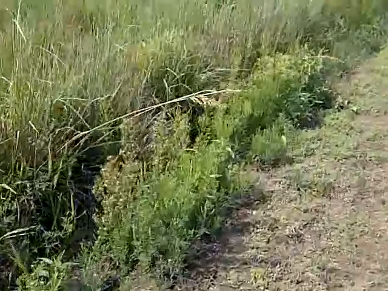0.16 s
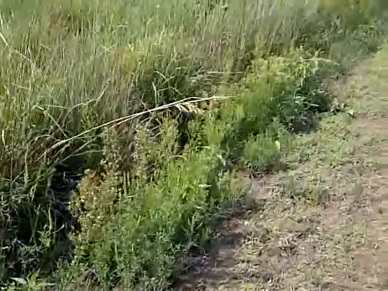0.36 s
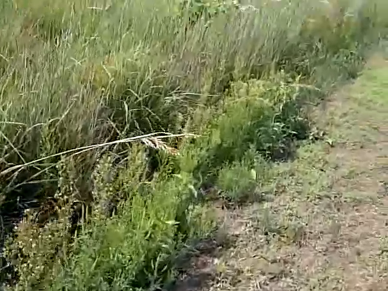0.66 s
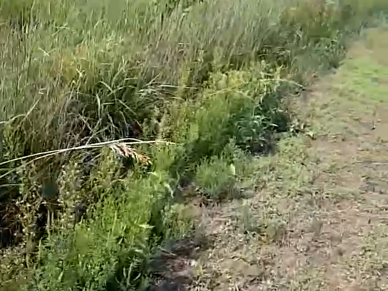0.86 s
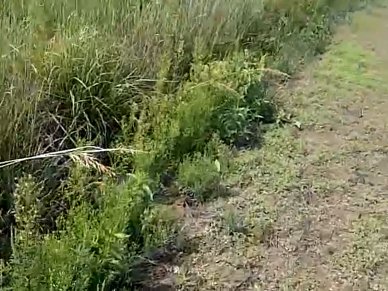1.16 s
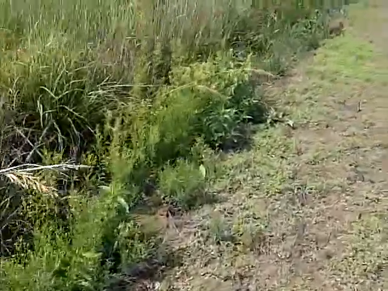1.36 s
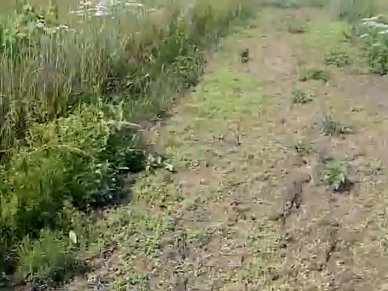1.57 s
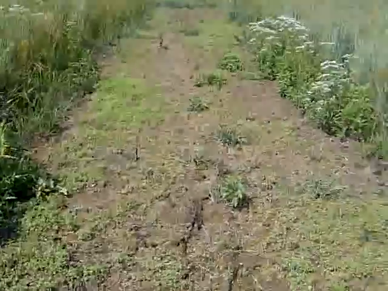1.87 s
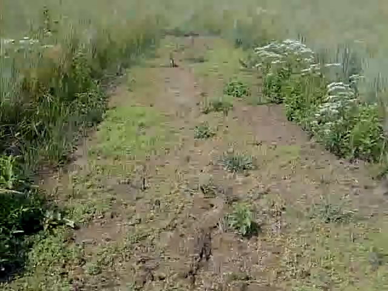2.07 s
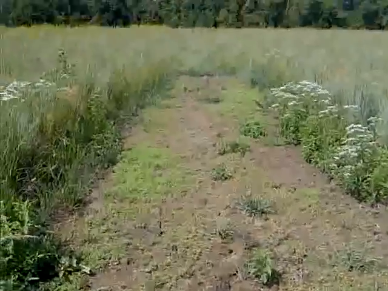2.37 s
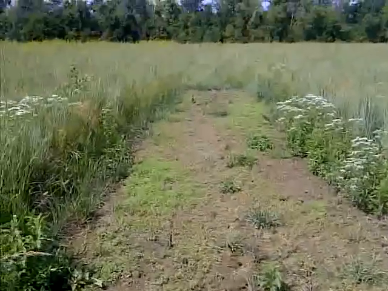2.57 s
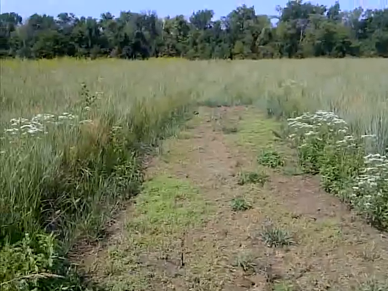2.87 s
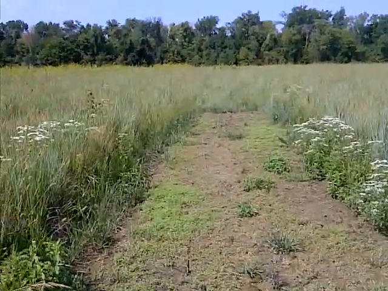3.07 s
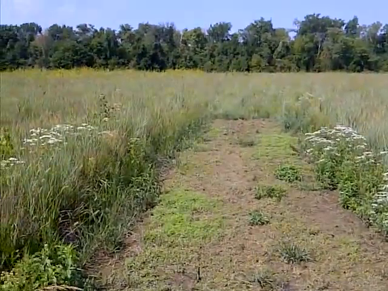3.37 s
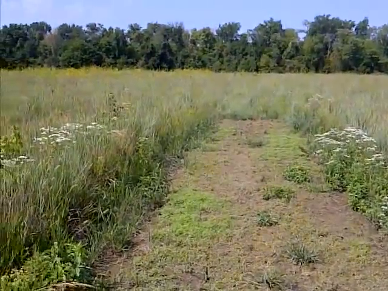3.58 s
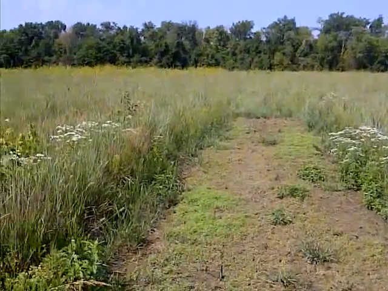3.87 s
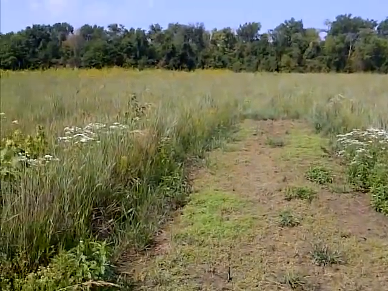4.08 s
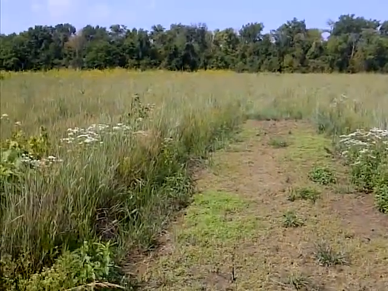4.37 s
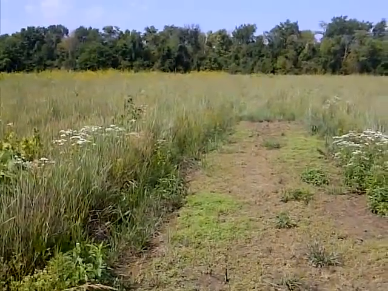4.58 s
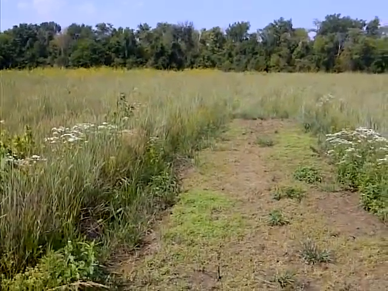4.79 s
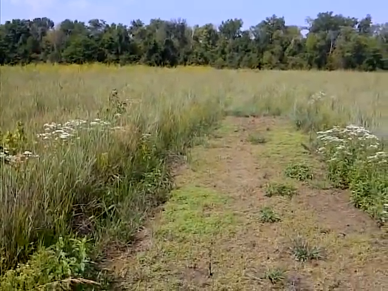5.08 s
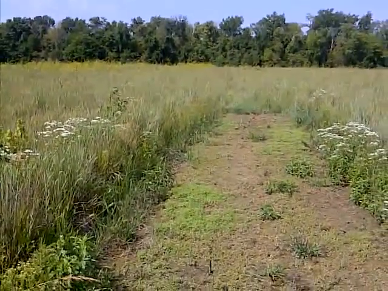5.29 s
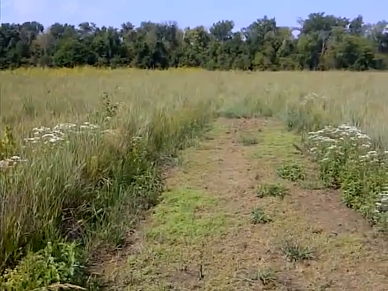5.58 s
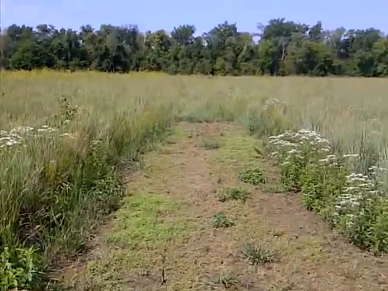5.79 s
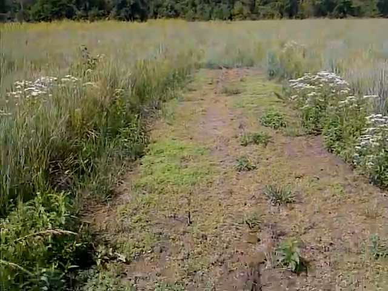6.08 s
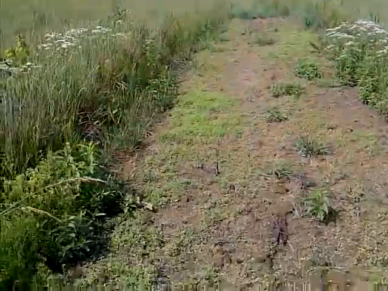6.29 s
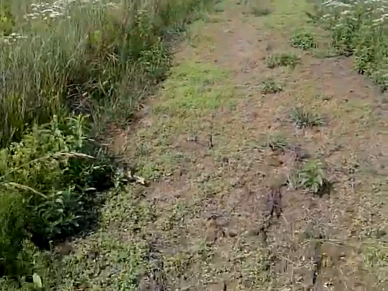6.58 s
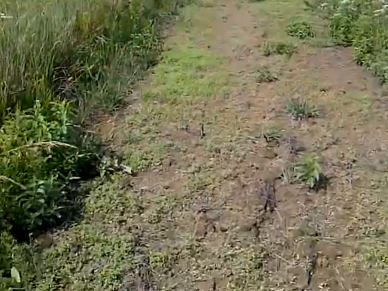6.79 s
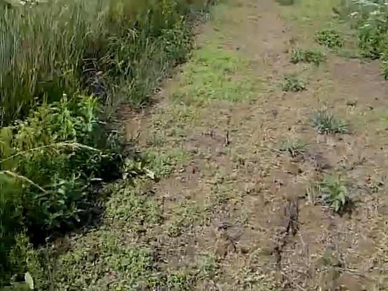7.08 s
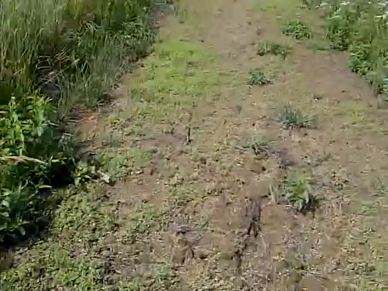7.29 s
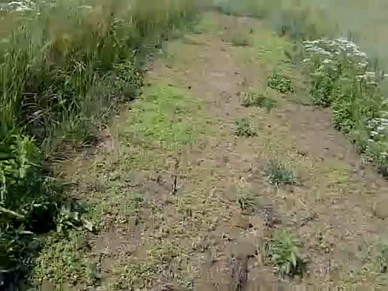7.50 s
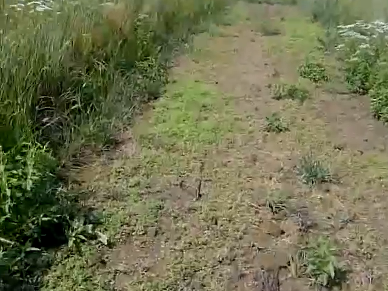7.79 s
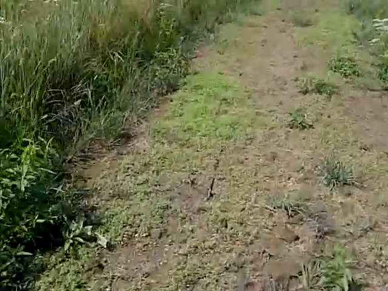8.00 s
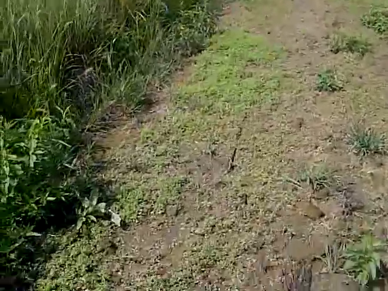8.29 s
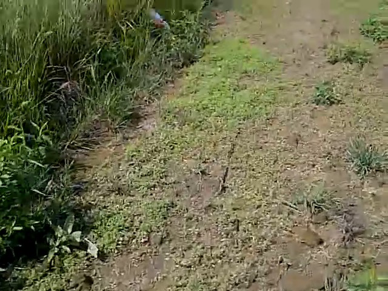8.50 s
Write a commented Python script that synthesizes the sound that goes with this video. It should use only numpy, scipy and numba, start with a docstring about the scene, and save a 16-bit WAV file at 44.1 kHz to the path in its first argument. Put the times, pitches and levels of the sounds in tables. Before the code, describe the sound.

A hound's faint yips grow into high, cracking bays over distant engine putter, wind rumble, rustling grass and sharp stalk snaps in an open meadow.

```python
"""A small one-cylinder engine revs some way off, as pulses ringing resonances, over leaf hiss and insects (band noise).
Wind rumbles and thumps on a hand-held phone (low noise, damped sines); from 1.4 s stalks snap, as damped tones and
noise, and grass swishes, as band noise. From 2.8 s a hound yips and from 4.7 s it bays, as harmonics with throat noise.
Its voice comes to break between a high note and half that pitch. From 5.8 s the engine's hiss swells and brightens,
and from 6 s harder snaps and more swishes join the bays, which last to the end."""
import sys
import numpy as np
from scipy import signal
from scipy.fft import rfft, irfft
from scipy.io import wavfile
from scipy.ndimage import uniform_filter1d
from numba import njit

SR = 44100
rng = np.random.default_rng(int(sys.argv[2]) if len(sys.argv) > 2 else 0)


def field_ratio(decibels):
    """Amplitude ratio for a level in dB (20 dB per decade); scalars and array-likes work."""
    return 10 ** (np.asarray(decibels, dtype=float) / 20)


def unload_audio(sound):
    """Save the sound as a 16-bit wav file, at the path given as the first command line argument."""
    columns = np.transpose(np.atleast_2d(sound))
    # keep every value between -1 and 1, then stretch to whole-number steps
    steps = np.round(np.clip(columns, -1, 1) * 32767)
    wavfile.write(sys.argv[1], SR, steps.astype(np.int16))


N = 381465

# Vocal-fold curves, one list a bay: (time [s], high note [Hz], effort [dB], voice break: half note over high note [dB],
# mouth opening: octave over effort [dB], roughness [0-1])
BAY_CURVES = [
    [(4.66, 1327, -39, -58, -22.5, 0.1), (4.672, 1412, -27.5, -65, -23, 0.04),
     (4.69, 1528, -34, -62, -13, 0.03), (4.71, 1512, -34.5, -65, 0, 0.03),
     (4.75, 1427, -26, -60, -19, 0.02), (4.78, 1397, -23.5, -66, -15, 0.02),
     (4.855, 1286, -34.5, -58, -4.5, 0.05), (4.875, 1418, -32.5, -45, -20, 0.05),
     (4.897, 1483, -32, -53, -25, 0), (4.91, 1326, -45, -60, -48, .08), (4.925, 714, -61, -63, -20, 0.2)],
    [(5.072, 898, -38.5, -58, -34.5, 0), (5.084, 901, -25.5, -61.5, -19, 0.01),
     (5.099, 976, -23.5, -56.5, -28, 0.06), (5.104, 1390, -24.5, -50, -19, 0.01),
     (5.12, 1467, -19.5, -61, -18, 0), (5.14, 1460, -18, -60.5, -29.5, 0.02),
     (5.17, 1434, -19, -31, -21, 0.01), (5.2, 1349, -23, -52, -8.5, 0.03),
     (5.215, 1414, -26, -61, -13.5, 0.03), (5.23, 1293, -64, -59, -16, .05)],
    [(5.556, 950, -38.5, -65.5, -35, .05), (5.568, 954, -23.5, -56, -30.5, 0),
     (5.58, 874, -27, -34.5, -12, 0.45), (5.587, 1397, -27, -17, -34, 0.24),
     (5.598, 1457, -21.5, -65, -20.5, 0.02), (5.61, 1490, -23.5, -31, -20.5, 0.02),
     (5.63, 1468, -21.5, -29, -27, 0.02), (5.65, 1427, -20, -1.5, -22, 0.01),
     (5.665, 1419, -20.5, -1, -32.5, 0.03), (5.69, 1294, -32, -1.5, -10.5, 0.03),
     (5.705, 1267, -33, -52, -19, 0), (5.735, 1340, -48, -49, -16.5, 0.14)],
    [(7.137, 1570, -45, 19, -34, 0.2), (7.151, 1472, -40, 5.5, -36.5, 0.75),
     (7.165, 1690, -29.5, 16, -42.5, 0.89), (7.175, 1315, -28.5, -3.5, -21, 0.61),
     (7.19, 1415, -31, -7.5, -8, 0), (7.217, 1397, -27, -2, -2, 0.27),
     (7.235, 1329, -20, -12.5, -12.5, 0.1), (7.252, 1357, -19, -15.5, -9, 0.21),
     (7.267, 1332, -15, -19, -15.5, 0.07), (7.285, 1287, -18.5, -16, -19, 0.06),
     (7.3, 1297, -17.5, -20, -11, 0.09), (7.345, 1282, -29.5, -48, -14, 0.08),
     (7.37, 1208, -61, -45.5, 24.5, 0.09), (7.39, 1212, -48, -46, 9, 0.07),
     (7.41, 1408, -42.5, -45, -16, 0.2), (7.425, 1320, -61, -45, -14, .05)],
    [(7.655, 1528, -31.5, 31, -43, 0.3), (7.67, 1495, -27.5, 21, -10.5, 0.55),
     (7.685, 1644, -12.5, 25.5, -38, 0.08), (7.695, 1374, -30, 10.5, 4, 0.61),
     (7.71, 1434, -24.5, -20, -3, 0), (7.73, 1367, -31, 12, -6.5, 0.03),
     (7.745, 1470, -22, 11.5, -39, 0.05), (7.762, 1410, -30.5, 1.5, 3.5, 0),
     (7.78, 1349, -16, 13.5, -20, 0), (7.8, 1337, -26, -5, -3.5, 0.01), (7.82, 1244, -28.5, 2, -18, .05),
     (7.835, 1265, -36, -42, -15.5, 0), (7.85, 1290, -30.5, -25.5, -17.5, 0.03),
     (7.88, 1262, -42.5, -46.5, -32, 0.2)],
    [(8.153, 1214, -45, 30, -35, 0.05), (8.161, 1364, -19.5, 41, -43, 0.17),
     (8.175, 1425, -24, 36, -17, 0.65), (8.19, 1277, -24, 12, -6, 0.51), (8.21, 1279, -33, -12, 8.5, 0),
     (8.23, 1269, -22, 12.5, -4.5, 0.6), (8.25, 1282, -20, 16.5, -4, 0.43),
     (8.27, 1225, -19, 14, -9.5, 0.67), (8.29, 1121, -17, 3.5, -27, 0.31),
     (8.307, 1158, -22.5, 9, -22.5, .7), (8.34, 1152, -18, 9, -28, 0.34),
     (8.36, 1186, -17.5, -1.5, -18.5, .04), (8.42, 1241, -14, 7.5, -29.5, 0.01),
     (8.46, 1236, -16.5, 10.5, -14.5, 0.03), (8.5, 1182, -19.5, -5.5, -44.5, 0),
     (8.53, 1164, -21, -4, -26, .02), (8.557, 1217, -18, 2, -22.5, 0.02),
     (8.575, 1186, -16, 7, -25.5, 0.09), (8.595, 1136, -28, 5, -26, 0.01), (8.61, 1246, -28, -34, -8, 0.05),
     (8.635, 1206, -41, -45, -21, 0.2), (8.649, 785, -55, -45, -28, 0.2)],
]
# Short rising yips: (time [s], length [s], first note [Hz], top note [Hz], effort [dB])
YIP_CALLS = [(2.833, 0.036, 660, 860, -53), (3.048, 0.079, 815, 1272, -44), (3.303, 0.031, 742, 952, -34),
             (3.749, 0.027, 680, 685, -61), (3.914, 0.045, 500, 617, -54), (4.06, 0.057, 688, 1043, -47.5),
             (4.427, 0.039, 902, 1014, -33), (6.984, 0.05, 744, 883, -52.5)]
# Throat resonances, each passed twice: (centre [Hz], width of one pass [Hz], level [dB])
THROAT_RESONANCES = [(700, 320, 15.5), (1160, 110, 4), (1827, 170, 5.5), (2630, 530, 2)]
# Colour of the rasp after the throat: (frequency [Hz], gain [dB])
RASP_COLOUR = [(250, -46), (500, -7), (3150, -1.0), (3600, -17.5), (4300, -13), (5300, -4), (7000, -23.0)]
# Radiation from a small mouth: (frequency [Hz], gain [dB])
MOUTH_RADIATION = [(150, -40), (330, -20), (430, -12), (540, 0), (8000, 0)]
# Engine speed; the boom slides as load and bearing change: (time [s], firing rate [Hz], boom centre [Hz])
ENGINE_SPEED = [(0, 21.3, 105), (.53, 23.2, 109), (.82, 21.5, 111), (1.0, 22.7, 116), (1.45, 26.3, 133),
                (2.3, 26.3, 134), (2.41, 23.1, 94), (2.79, 19, 78), (3.25, 18, 98), (3.85, 15, 91),
                (4.6, 13.7, 92), (5.11, 20.2, 105), (5.39, 23.3, 110), (5.88, 26.9, 128), (6.06, 28.5, 113),
                (6.5, 27.1, 112), (7.15, 26.3, 128), (7.6, 27.1, 116), (7.95, 27.9, 117), (8.65, 28.3, 120)]
# Boom gain as load and bearing change: (time [s], gain [dB])
ENGINE_BOOM = [(0, -55), (.41, -54.5), (1.06, -46.5), (1.6, -49.5), (2.25, -49.5), (2.46, -48), (2.84, -57),
               (3.35, -64), (3.55, -55), (3.93, -68.5), (4.26, -58.5), (4.41, -58), (4.77, -52),
               (5.45, -47.5), (5.83, -49.5), (6.17, -48), (7.05, -50), (7.66, -48), (8.65, -47.5)]
# Response of the exhaust pipe: (frequency [Hz], gain [dB])
EXHAUST_RESPONSE = [(25, -32), (54, 7.5), (80, -14), (110, -7.5), (160, 4.5), (190, -13), (235, 8),
                    (270, -14.5), (340, -35), (600, -53)]
# Wind rumble before the quick gusts: (time [s], level [dB])
WIND_RUMBLE = [(0, -60), (.38, -56), (.46, -49.5), (.91, -48.5), (1.06, -53), (1.76, -61), (1.83, -55),
               (1.95, -56), (2.05, -62), (2.55, -54.5), (3.28, -56.5), (3.88, -66.5), (4.36, -58.5),
               (4.7, -65.5), (5.9, -66), (6.0, -49), (6.12, -56), (6.8, -52), (6.9, -48), (7.05, -62.5),
               (8.65, -68.5)]
# Spectrum of the rumble: (frequency [Hz], relative density [dB per Hz])
WIND_SPECTRUM = [(15, -26), (35, -10), (60, -1), (95, 0), (140, -5), (200, -13), (300, -27), (600, -50)]
# Thumps of air and hand on the microphone:
# (time [s], envelope peak [dB], pitch [Hz], rise to the envelope peak, held to at least 0.2 [cycles])
MICROPHONE_THUMPS = [(0.439, -42, 186, 0.92), (0.494, -40, 106, 0.83), (0.859, -31.5, 121, 0.17),
                     (0.876, -25, 168, 0.18), (0.885, -34, 104, 0.28), (0.921, -33, 140, 0.18),
                     (0.978, -26.5, 115, 0.15), (1.003, -30, 135, 0.23), (1.02, -24, 117, 0.27),
                     (1.042, -32.5, 126, 0.42), (1.821, -37, 120, 0.2), (1.93, -41, 85, 0.3),
                     (2.306, -52, 129, 0.16), (4.12, -50, 180, 1), (4.17, -45.5, 177, 1),
                     (4.349, -53, 212, 0.98), (5.997, -29.5, 188, 0.32), (6.845, -30.5, 178, 0.16),
                     (7.197, -31.5, 133, 0.15), (7.295, -19, 223, 0.24), (7.31, -29.5, 308, 0.62)]
# Dry stalks breaking: (time [s], crack level [dB], ring [Hz], dull knock over crack [dB])
STALK_SNAPS = [(1.446, -47.5, 1470, 6), (1.547, -43, 1450, 3), (1.597, -30, 1530, -1.5),
               (1.64, -28, 1860, -8), (1.665, -43.5, 1370, 10), (1.786, -41, 1500, 2),
               (2.191, -49, 1360, 8), (2.313, -48, 1210, 12), (5.995, -13, 1400, -23),
               (6.318, -18.5, 2170, -52), (6.427, -23.5, 1630, -27), (6.558, -19.5, 1090, -16),
               (6.576, -22.5, 1090, 2), (6.712, -38.5, 2010, 8.5), (6.773, -30.5, 1130, 3),
               (6.872, -34.5, 1530, -9), (6.9, -19.5, 3060, -10), (6.92, -14.5, 3140, -7),
               (6.984, -36.5, 1190, 5.5), (7.12, -38, 1460, -12), (7.195, -34, 650, 15),
               (7.257, -38, 3600, -8), (7.301, -23.5, 750, -0.5), (7.48, -24.5, 1750, -8.5),
               (8.109, -37.5, 1678, -4), (8.136, -43, 800, 7)]
# Grass brushed aside: (time [s], length [s], level before the envelope [dB], centre [Hz], width of one pass [Hz])
GRASS_SWISHES = [(1.565, .2, -58.5, 1430, 606), (1.904, 0.085, -58, 1340, 910),
                 (1.923, 0.034, -66, 3960, 4000), (2.187, 0.048, -59, 1410, 500),
                 (5.981, 0.056, -61, 3470, 5180), (6.268, 0.076, -65.5, 3500, 4000),
                 (6.374, .04, -58, 960, 800), (6.566, 0.43, -60, 1090, 1520),
                 (6.707, 0.083, -58, 4060, 4480), (6.844, .06, -51.5, 3600, 4860),
                 (6.918, 0.024, -56, 4500, 5000), (6.988, 0.087, -61, 2970, 4430),
                 (7.13, 0.15, -58, 3900, 4950), (7.829, 0.27, -68.5, 3800, 1490),
                 (6.844, 0.022, -44, 700, 900)]
# Spectrum of the far leaves: (frequency [Hz], relative density [dB per Hz])
LEAF_SPECTRUM = [(150, -36.5), (250, -6), (288, -4), (388, -7), (488, -8), (516, -12.5), (554, -9),
                 (676, -9.5), (737, -8.5), (965, -13.5), (1180, -11), (1540, -15), (7480, -29.5),
                 (9720, -56.5), (16500, -120)]


def hound():
    """Voiced sound as harmonics of the vocal folds, with turbulent air in the throat when the folds are rough."""
    out = np.zeros(N)
    shake, air = walk(350), rng.standard_normal(N)
    flutter = np.array([walk(120) for _ in range(10)])
    patchy = np.array([walk(33) for _ in range(10)])
    rasp = throat_rasp(air)
    breath = level(band(band(air, 800, 55), 800, 70), -39.5)
    for call in [yip(*row) for row in YIP_CALLS] + BAY_CURVES:
        i, (hz, effort_db, break_db, mouth_db, rough) = played(call)
        # the phase runs at the half note; roughness shakes it
        phase = np.pi * np.cumsum(hz * (1 + 0.063 * rough * shake[i])) / SR
        lines = partials(hz, effort_db, break_db, mouth_db)
        voice = np.zeros(len(i))
        for k, db in enumerate(lines):
            line_db = db
            depth_db = 7 * rough
            if k > 4:
                # above the fifth line the throat lets little through, and that comes and goes
                depth_db = depth_db + 4 + 3 * patchy[k, i]
                line_db = line_db + 20.0 * np.minimum(patchy[k, i], .3)
            line_db = line_db + depth_db * np.tanh(flutter[k, i])
            voice += field_ratio(line_db) * np.cos((k + 1) * phase - 0.31 * k)
        # rough folds close strong-weak-strong and throb every few cycles
        strong_weak = 0.5 * np.cos(phase / 2 + 1.5 * shake[i])
        throb = 0.47 * np.cos(phase / 5 + flutter[0, i])
        voice *= 1 + rough * (strong_weak + throb)
        puffs = 1 + 0.1 * np.cos(phase)  # the rasp pulses gently at the half note
        effort = np.sqrt(sum(field_ratio(2 * db) for db in lines))
        throat_air = effort * (0.65 * rough * puffs * rasp[i] + breath[i])
        edge = np.minimum(1, np.minimum(i - i[0], i[-1] - i) / (0.0024 * SR))
        out[i] -= edge * (np.sqrt(2) * voice + throat_air)
    return weed_scatter(shape(out, MOUTH_RADIATION))


def yip(s, length, first_hz, top_hz, db):
    """Gliding pitch: a yip climbs towards its top note, swelling as it climbs, and drops away."""
    glide_s, swell_db_per_octave, full_octaves = .045, 42, 0.055  # full voice this far below the top
    rise_s, rise_db, fall_s, fall_db = 0.0052, 13, 0.01, 21.5
    unbroken_db, roughness = -60, 0.057
    age = np.linspace(0, length, num=24)
    hz = first_hz + (top_hz - first_hz) * np.sin(np.pi / 2 * np.minimum(age / glide_s, 1))
    swell_db = swell_db_per_octave * np.maximum(np.log2(top_hz / hz) - full_octaves, 0)
    onset_db = rise_db * np.maximum(1 - age / rise_s, 0)
    ending_db = fall_db * np.maximum(1 - (length - age) / fall_s, 0)
    # the barely open mouth favours an octave near 1956 Hz
    mouth_db = np.maximum(-12.5 - 90 * np.abs(np.log2(2 * hz / 1956)), -34)
    same = np.ones_like(age)
    effort_db = db - swell_db - onset_db - ending_db
    return np.transpose([s + age, hz, effort_db, unbroken_db * same, mouth_db, roughness * same])


def partials(hz, effort_db, break_db, mouth_db):
    """Harmonic levels over the half note: the voice break shares out the effort, the mouth opening brightens."""
    half_db = effort_db - 10 * np.log10(1 + field_ratio(-2 * break_db))
    high_db = effort_db - 10 * np.log10(1 + field_ratio(2 * break_db))
    octave_db = effort_db + mouth_db
    # upper odd lines need a broken voice: below a break of -13.5 dB they fade
    odd_db = effort_db + 1.3 * np.minimum(break_db + 13.5, 0)
    third_fall_db = 32 * np.maximum(3 / 2 * hz - 1925, 0) / 1e3  # 32 dB per kHz
    third_db = odd_db - 6 + 0.58 * mouth_db - third_fall_db
    throat_top_hz, throat_fall_db_per_khz = 3190, 44.5
    fifth_db = odd_db - 23 - throat_fall_db_per_khz * np.maximum(5 / 2 * hz - throat_top_hz, 0) / 1e3
    sixth_db = high_db - 34 - throat_fall_db_per_khz * np.maximum(6 / 2 * hz - throat_top_hz, 0) / 1e3
    sixth_db = np.maximum(effort_db - 47, sixth_db)
    return [half_db, high_db, third_db, octave_db, fifth_db, sixth_db,
            odd_db - 56, effort_db - 61, odd_db - 60.5, effort_db - 68.5]


def throat_rasp(air):
    """Turbulence noise filtered by the throat resonances, sputtering at random."""
    spit = field_ratio(2 * walk(200))
    rasp = sum(field_ratio(db) * band(band(air, hz, width), hz, width) for hz, width, db in THROAT_RESONANCES)
    return level(shape(rasp, RASP_COLOUR), 0) * spit


def weed_scatter(x):
    """Diffuse scattering: the surrounding weeds add a short, exponentially decaying noise tail."""
    t60_s, tail_db = .12, -24
    t = np.arange(int(.3 * SR)) / SR
    tail = rng.standard_normal(len(t)) * np.exp(-np.log(1000) * t / t60_s)
    tail /= np.sqrt(np.sum(tail ** 2))
    return x + field_ratio(tail_db) * signal.fftconvolve(x, tail)[:N]


def engine():
    """Impulse excitation of resonators: firings ring silencer and pipe, while fan and valve gear hiss."""
    (hz, boom_hz), (boom_db,) = whole(ENGINE_SPEED), whole(ENGINE_BOOM)
    # over 1.7 s from 5.8 s the hiss swells and brightens, and the pipe barks less
    turned = np.clip((np.arange(N) / SR - 5.8) / 1.7, 0, 1)
    over_hz = hz - 26.5  # firing rate over full revs; bark and hiss rise with it
    bark_db = -57 + 1.2 * over_hz - 4 * turned
    gear_db = -72 + 0.9 * over_hz + 11.5 * turned
    gear_hz = 1450 + 500 * turned
    turns = np.cumsum(hz) / SR
    pulses = firings(hz, turns)
    boom = sliding_band(sliding_band(pulses, boom_hz, 36.), boom_hz, 50.0)
    bark = shape(pulses, EXHAUST_RESPONSE)
    gear = sliding_band(sliding_band(rng.standard_normal(N), gear_hz, 640.0), gear_hz, 760.0)
    # the hiss is a little stronger at the start of each cycle
    gear = level(gear, 0) * (0.93 + 0.19 * np.exp(-(turns % 1) / 0.11))
    return field_ratio(boom_db) * level(boom, 0) + field_ratio(bark_db) * level(bark, 0) + field_ratio(gear_db) * gear


def firings(hz, turns):
    """A jittered pulse train, one firing a cycle: nearly steady at speed, lumpy near idle."""
    fired = np.flatnonzero(np.diff(np.floor(turns)))
    chance = rng.standard_normal((400, 2))[:len(fired)]
    uneven = .008 + .12 * np.clip((20 - hz[fired]) / 10, 0, 1)  # timing spread in cycles
    late = (uneven * chance[:, 0] * SR / hz[fired]).astype(int)
    at = np.clip(fired + late, 0, N - 1)
    pulses = np.zeros(N)
    strength_db = (-0.26 + 24 * uneven) * chance[:, 1]
    pulses[at] = field_ratio(strength_db) / np.sqrt(hz[fired])  # offsets the power of a faster train
    return pulses


def wind():
    """Turbulent pressure at the microphone: gusty low noise, with thumps as damped sines."""
    gusts_db = 2.5 * walk(12)
    rumble = level(shape(rng.standard_normal(N), WIND_SPECTRUM), 0)
    out = rumble * field_ratio(whole(WIND_RUMBLE)[0] + gusts_db)
    t = np.arange(int(.12 * SR)) / SR
    for s, peak_db, hz, cycles in MICROPHONE_THUMPS:
        k = int(s * SR)
        age = t * hz / max(cycles, .2)
        envelope = np.e * age * np.exp(-age)
        out[k:k + len(t)] += field_ratio(peak_db) * np.sin(2 * np.pi * hz * t) * envelope
    return out


def stalks():
    """Brittle fracture: a sharp damped crack, splintering noise that rings on, and a dull knock."""
    out = np.zeros(N)
    t = np.arange(int(0.07 * SR)) / SR
    splinter = rng.standard_normal((len(STALK_SNAPS), len(t)))
    for (s, peak_db, hz, dull_db), noise in zip(STALK_SNAPS, splinter):
        crack = -np.sin(2 * np.pi * hz * t) * np.exp(-t / 0.00028)
        decay = 1.2 * np.exp(-t / 0.0011) + 0.08 * np.exp(-t / 0.0072)
        splinters = band(noise * decay, hz, 0.5 * hz)
        knock = field_ratio(dull_db) * np.sin(2 * np.pi * 600 * t) * np.exp(-t / 0.00076)
        k = int(s * SR)
        out[k:k + len(t)] += field_ratio(peak_db) * (crack + splinters + knock)
    return out


def grass():
    """Friction noise of rubbing blades: grainy, band-limited swishes that start quicker than they fade."""
    out = np.zeros(N)
    grains = rng.exponential(size=SR // 2 // 50).repeat(50)  # 50 samples a grain
    rub = rng.standard_normal((len(GRASS_SWISHES), SR // 2)) * field_ratio(0.63 * grains)
    for (s, length, db, hz, width), noise in zip(GRASS_SWISHES, rub):
        k, u = int(s * SR), np.linspace(0, 1, int(length * SR))
        swish = level(band(band(noise, hz, width), hz, width), db)[:len(u)]
        out[k:k + len(u)] += swish * np.sqrt(np.sin(np.pi * u ** 0.61).clip(0))
    return out


def meadow():
    """Superposition of many far sources as noise: gently swelling leaves and a thin band of insects."""
    insects = level(band(rng.standard_normal(N), 4700, 600), -81) * field_ratio(2.4 * walk(6.2))
    leaves = level(shape(rng.standard_normal(N), LEAF_SPECTRUM), -65.5) * field_ratio(0.27 * walk(1.5))
    return leaves + insects


def shape(x, points):
    """Minimum-phase filter through (frequency [Hz], gain [dB]) points, by folding the cepstrum."""
    hz, db = np.transpose(points)
    size = 2 ** 13
    grid = np.maximum(np.arange(size // 2 + 1) * SR / size, 1)
    cepstrum = irfft(np.log(field_ratio(np.interp(np.log(grid), np.log(hz), db))))
    cepstrum[1:size // 2] *= 2
    cepstrum[size // 2 + 1:] = 0
    impulse = irfft(np.exp(rfft(cepstrum)))
    return signal.fftconvolve(x, impulse)[:len(x)]


def band(x, hz, width):
    """Two-pole resonance of given centre and width [Hz]."""
    return signal.lfilter(*signal.iirpeak(hz, hz / width, fs=SR), x)


@njit
def sliding_band(x, hz, width):
    """State-variable band-pass resonance whose centre moves every sample."""
    y, b, l = np.empty(len(x)), 0., 0.  # b and l: band and low states
    for i in range(len(x)):
        g, k = np.tan(np.pi * hz[i] / SR), width / hz[i]
        v = (b + g * (x[i] - l)) / (1 + g * (g + k))
        b, l, y[i] = 2 * v - b, l + 2 * g * v, k * v
    return y


def level(x, db):
    """Root-mean-square normalisation to a level [dB]."""
    return x * field_ratio(db) / np.sqrt(np.mean(x ** 2))


def walk(rate, size=N):
    """Slow random modulation: levels held 1 / rate [s] and smoothed twice, spread near 1."""
    k = int(SR / rate)
    held = np.repeat(rng.standard_normal(size // k + 1), k)
    return 1.4 * uniform_filter1d(uniform_filter1d(held, k), k)[:size]


def played(table):
    """Linear interpolation of a curve table over its own span: sample indices and columns."""
    s, *columns = np.transpose(table)
    i = np.arange(int(s[0] * SR), min(int(s[-1] * SR) + 1, N))
    return i, [np.interp(i / SR, s, c) for c in columns]


def whole(table):
    """Linear interpolation of a curve table's columns at every sample of the scene."""
    s, *columns = np.transpose(table)
    return [np.interp(np.arange(N) / SR, s, c) for c in columns]


def scene():
    """Superposition of all sources at one microphone."""
    return (hound() + engine() + wind() + stalks() + grass() + meadow())[None]


def top_cut(x):
    """Nothing passes above the cut-off."""
    return signal.sosfilt(signal.butter(12, 7630, fs=SR, output="sos"), x)


def record(dry):
    """Band limiting: the phone cuts steeply above 7350 Hz with an elliptic low-pass."""
    low_pass = signal.ellip(8, .5, 56, 7350, fs=SR, output="sos")  # order, ripple dB, stop dB, edge Hz
    mix = signal.sosfilt(low_pass, dry)
    return top_cut(mix)


dry = scene()
out = record(dry)
unload_audio(out)
```